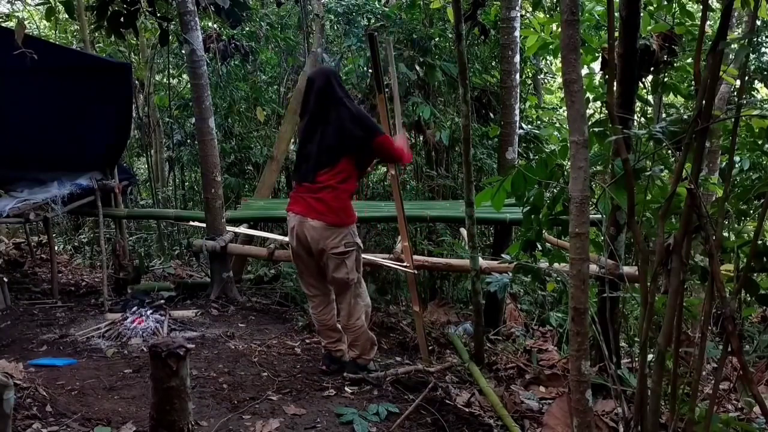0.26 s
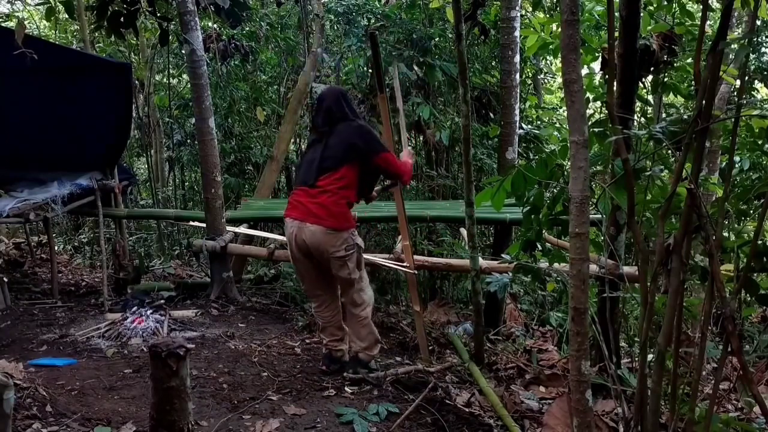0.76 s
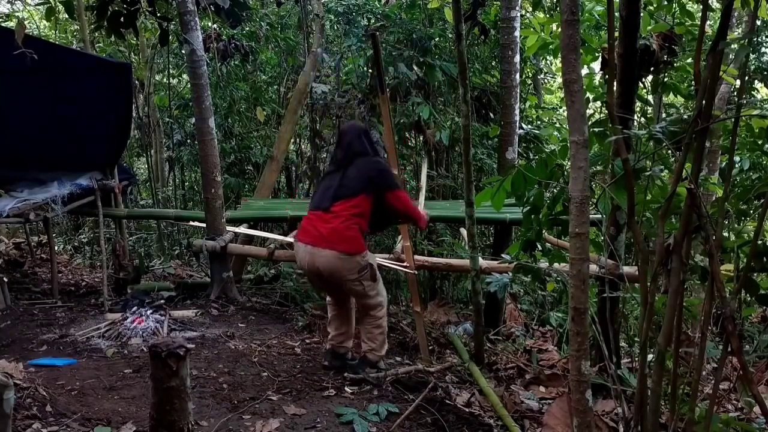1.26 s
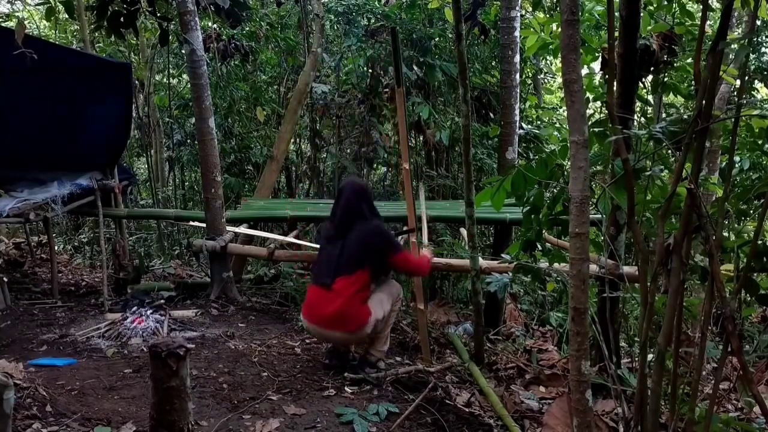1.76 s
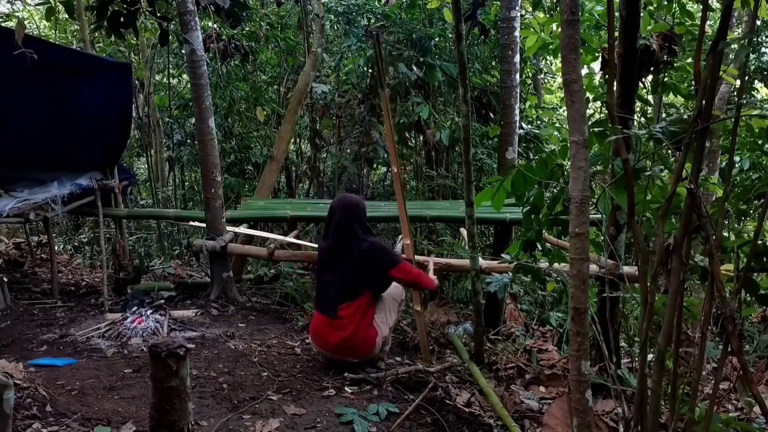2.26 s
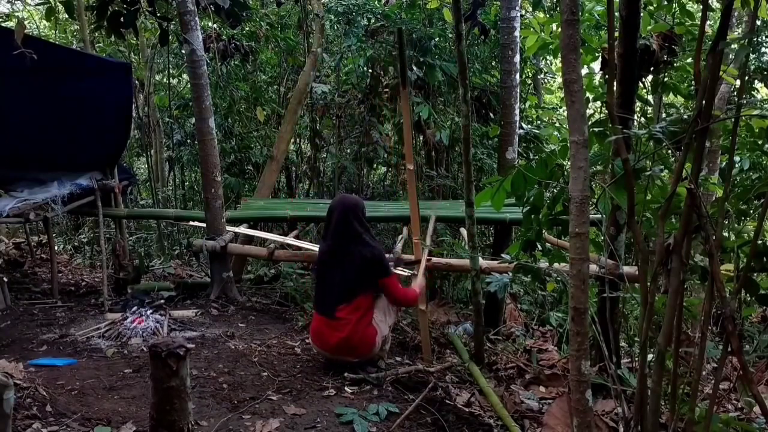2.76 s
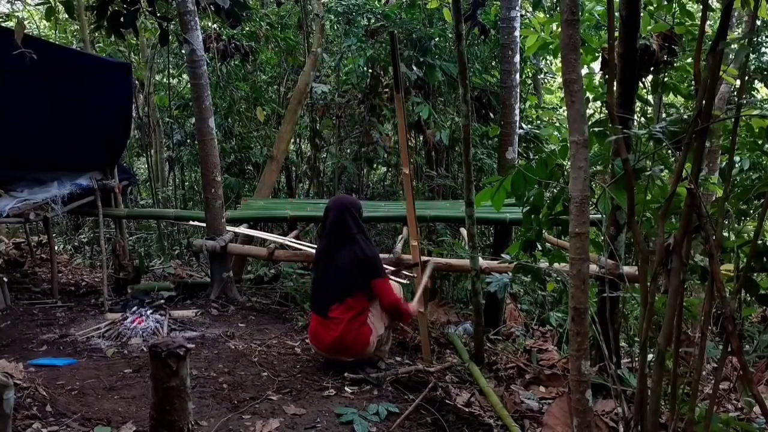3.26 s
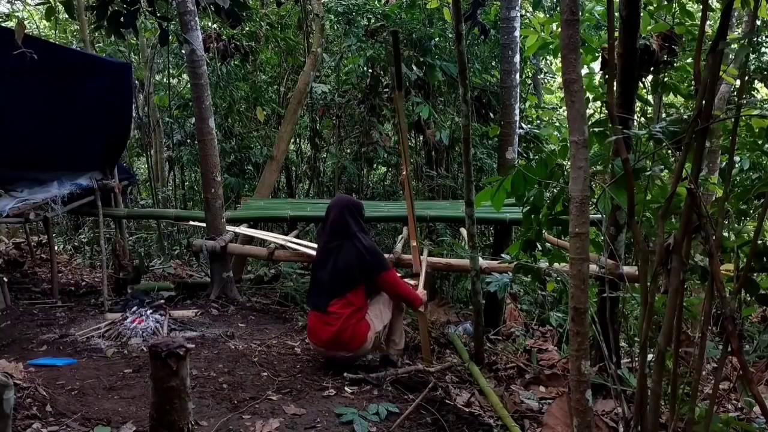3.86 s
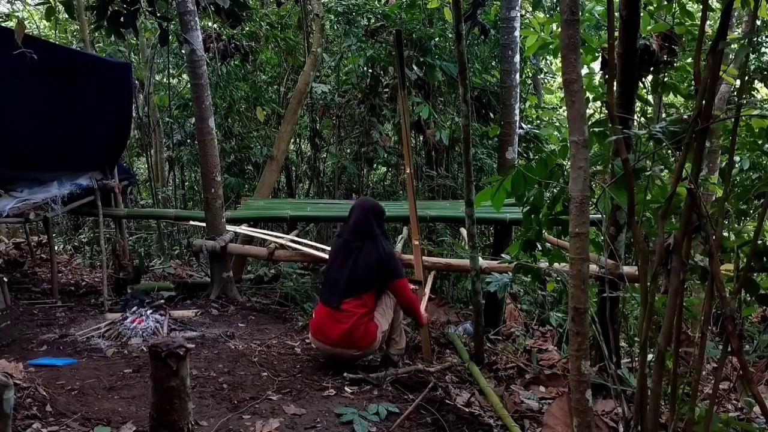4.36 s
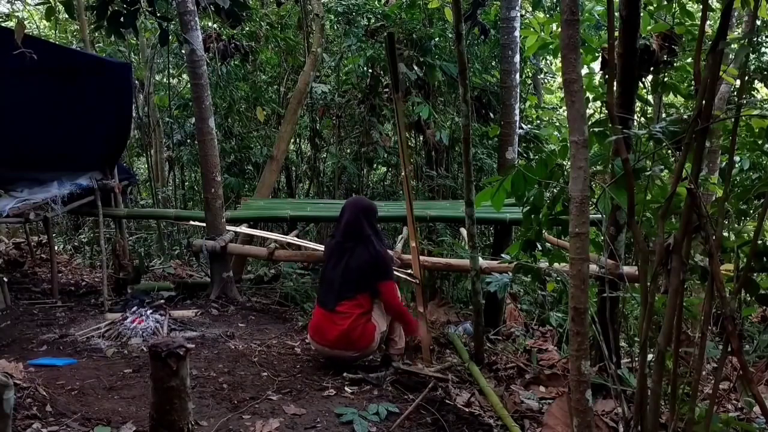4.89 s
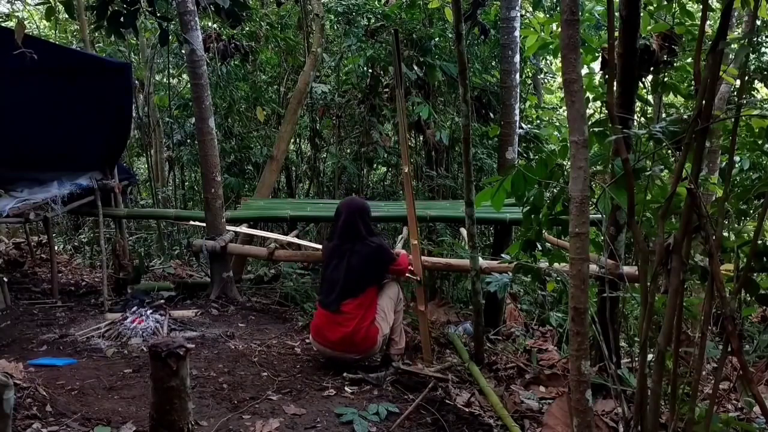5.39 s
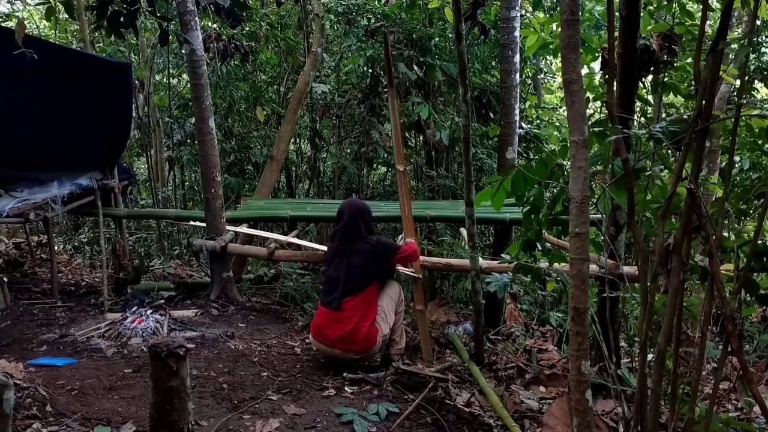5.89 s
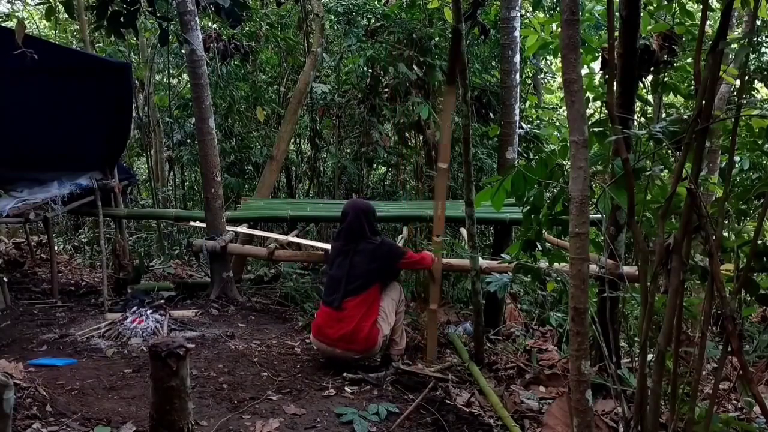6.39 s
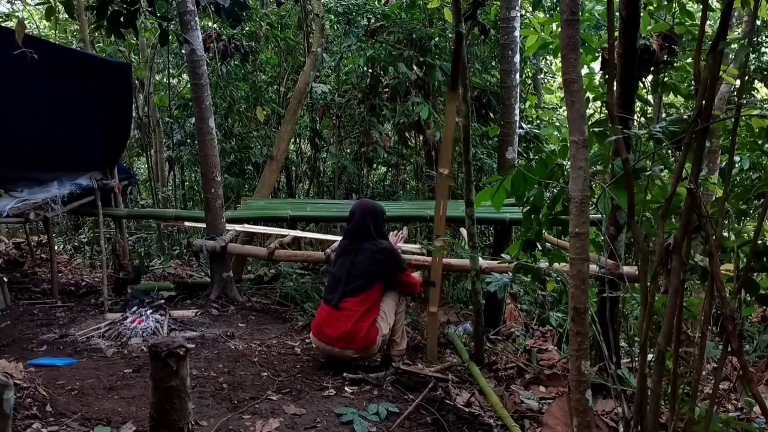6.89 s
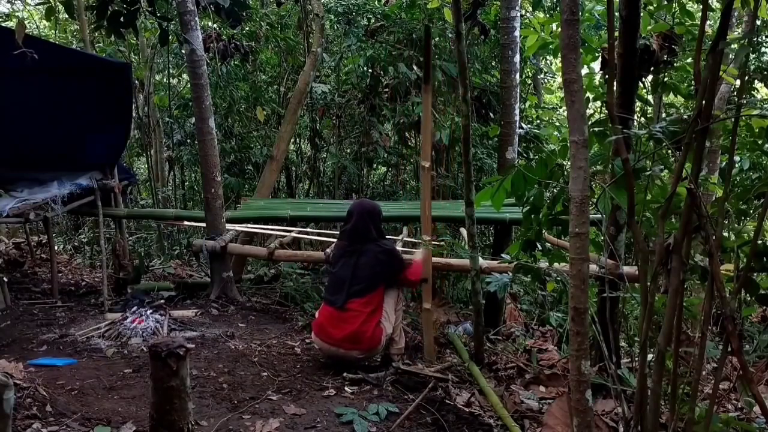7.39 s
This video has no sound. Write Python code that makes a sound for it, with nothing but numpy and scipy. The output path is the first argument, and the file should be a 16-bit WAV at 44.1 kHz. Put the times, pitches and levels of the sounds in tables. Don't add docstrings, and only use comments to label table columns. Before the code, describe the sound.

In a forest, a person handles bamboo poles against a bamboo frame. Hard hollow knocks with rattling splinters and soft ground thuds come irregularly in the first half, the loudest near the middle, then only faint taps near the end. Cicadas sing throughout: rising whistles, short buzzes, a low drone and a shrill chorus that comes and goes. One fixed microphone, mono, with short echoes from trunks.

```python
import sys
import numpy as np
from scipy import signal
from scipy.fft import rfft, irfft
from scipy.io import wavfile
from scipy.ndimage import uniform_filter1d

SR = 44100
rng = np.random.default_rng(int(sys.argv[2]) if len(sys.argv) > 2 else 0)


def volts_from_decibels(level):
    exponent = np.asarray(level, float) / 20
    return 10 ** exponent


def int16_out(signal):
    q = np.round(np.clip(np.atleast_2d(signal).T, -1, 1) * 32767)
    wavfile.write(sys.argv[1], SR, q.astype(np.int16))


N = 336924

# start in seconds, length in seconds,
# goal of the tenth multiple in Hz, level in dB.
WHISTLES = [
    (2.504, 0.78, 3112, -39.5),
    (6.987, .7, 3114, -39),
    (.36, 0.81, 3032, -50.5),
    (4.96, .755, 3030, -50),
    (1.88, .54, 3000, -49.5),
    (5.872, 0.562, 3002, -49),
]


def evened(x):
    return x / np.sqrt(np.mean(x ** 2) + 1e-20)


def read(points, hz):
    f, value = np.transpose(points)
    return np.interp(np.log(hz + 1), np.log(f + 1), value)


def follow(points, t):
    return np.interp(t, *np.transpose(points))


def add(mix, s, sound):
    part = mix[round(s * SR):][:len(sound)]
    part += sound[:len(part)]


def drift(size, hz):
    knots = rng.standard_normal(size // 200 + 2)
    return evened(np.interp(np.arange(size) / SR * hz, np.arange(len(knots)), knots))


def coloured(size, points, treble_db=0):
    hz = np.fft.rfftfreq(size, 1 / SR)
    shape = volts_from_decibels(read(points, hz))
    lift = volts_from_decibels(treble_db / (1 + (5000 / (hz + 1)) ** 6))
    noise = irfft(rfft(rng.standard_normal(size)) * shape * lift, size)
    return noise / np.sqrt(np.mean(shape ** 2))


def resonate(x, hz, width):
    pole = np.exp((2j * np.pi * hz - np.pi * width) / SR)
    return signal.lfilter([1], [1, -2 * pole, pole ** 2], x).real


def swarm(peaks):
    return evened(sum(volts_from_decibels(db) * evened(resonate(rng.standard_normal(N), hz, width))
                      for hz, width, db in peaks))


def air():
    # pitch in Hz, level in dB per Hz.
    hiss_shape = [(25, 4), (40, -6.5), (80, -11), (140, -5), (230, -16.5), (420, -23.5), (1500, -24.5),
                  (1750, -6.5), (2900, -12), (3800, -14.5), (4200, -19), (4750, -18.5), (5300, -15.5),
                  (6900, -21), (8500, -12), (15700, -13)]
    # time in seconds, level change of the hiss around 4.5 kHz in dB.
    hush = [(0, 1), (.2, -8), (.35, -1), (.52, -8.5), (.75, 0), (.97, -10), (1.15, -2), (1.8, 4),
            (2.02, -4), (2.3, 2), (4, -1), (4.3, -7), (4.55, -1), (4.8, -2), (5.1, -5), (5.35, 2)]
    hush_hz, hush_width_hz = 4500, 450
    frames, hz = N // 256 + 5, np.fft.rfftfreq(1024, 1 / SR)
    a, b, patches = rng.standard_normal((frames, 513, 3)).T
    patches = evened(uniform_filter1d(uniform_filter1d(patches, 14, 0), 25, 1))
    patch_db = 2.17 * np.clip(hz / 600, .6, 1)[:, None] * patches
    z = (a + 1j * b) * volts_from_decibels(read(hiss_shape, hz)[:, None] + patch_db)
    hush_db = follow(hush, np.arange(frames) * 256 / SR)
    z = z * volts_from_decibels(np.exp(-((hz[:, None] - hush_hz) / hush_width_hz) ** 2) * hush_db)
    return volts_from_decibels(-49.5) * evened(signal.istft(z, nperseg=1024, noverlap=768)[1][:N])


def drone():
    # time in seconds, level in dB.
    swell = [(0, -58), (.4, -50), (1, -56), (1.2, -51.5), (2.13, -51), (2.83, -61.5), (3.36, -57),
             (3.8, -61), (4.09, -55), (5.77, -52.5), (5.96, -50.5), (6.41, -48.5), (7.0, -56.5),
             (7.64, -58)]
    # pitch in Hz, width in Hz, level in dB.
    hum_peaks = [(1829.5, 30, 9), (1748, 26, -6.5), (1920, 28, -18), (2130, 25, -5)]
    return volts_from_decibels(follow(swell, np.arange(N) / SR) - 3.0) * swarm(hum_peaks)


def shrill_swarm():
    # pitch in Hz, width in Hz, level in dB.
    shrill_peaks = [(7520, 910, -6), (8740, 780, -27), (11240, 590, -3), (13070, 1200, 3), (14980, 930, 1)]
    # time in seconds, level change in dB.
    swell = [(0, -1.5), (2, 2.5), (2.6, -7), (3.8, 1), (4.2, 0), (6.4, 1.5), (6.8, -2), (7.64, -2)]
    return volts_from_decibels(-50.5 + follow(swell, np.arange(N) / SR)) * swarm(shrill_peaks)


def chorus():
    # start in seconds, time it tires in seconds, level in dB.
    songs = [
        (-1, 1.68, -41.5),
        (4, 6.3, -42),
    ]
    singers_hz = [1849, 1854, 1867, 1877, 1889, 1897, 1905, 1917, 1926]
    # multiple of the pulse rate, level in dB.
    carried = [(5, -9), (6, 0.5), (7, 1), (8, 7)]
    # pitch in Hz, level in dB.
    strays = [(11700, -9), (12570, -7), (13400, -7), (13354, -5), (14250, -10), (11050, -3.5), (15178, -1)]
    swell_s, tire_db_per_s, murmur_db = 0.17, 32, -56
    sag_share, sag_s = .016, .35
    t, voices = np.arange(N) / SR, 0
    level, sag = volts_from_decibels(murmur_db), 1
    for start, end, db in songs:
        tired = volts_from_decibels(db - tire_db_per_s * np.maximum(t - end, 0))
        level = level + tired * np.clip((t - start) / swell_s, 0, 1)
        sag = sag - sag_share * np.clip((t - end) / sag_s, 0, 1) * (t < end + 1.5)
    for hz in singers_hz:
        waver = 1 + .0003 * drift(N, 6) + .0007 * drift(N, 200)
        turns = np.cumsum(hz * sag * waver) / SR
        tremble = volts_from_decibels(3.6 * drift(N, 11.0) + 1.9 * drift(N, 180))
        tone = sum(volts_from_decibels(k_db) * np.sin(2 * np.pi * round(k) * turns) for k, k_db in carried)
        voices = voices + tremble * tone
    clock = np.cumsum(sag) / SR
    for hz, db in strays:
        voices = voices + volts_from_decibels(7 + db + 3 * drift(N, 9)) * np.sin(2 * np.pi * hz * clock)
    smear = swarm([(11300, 960, -3.0), (12350, 600, -5.5), (12980, 570, -3.0), (14500, 770, -3.5)])
    return volts_from_decibels(-3.5) * level * evened(evened(voices) + 0.69 * smear)


def knock(db, modes, rattle_db, treble_db, t60):
    # pitch in Hz, rattle level in dB per Hz.
    rattle_shape = [(71, -61), (120, -2.5), (383, -20), (450, -15), (829, -4.5), (899, -10.5), (1100, -5.5),
                    (1620, -3), (3240, -2.5), (5960, -10), (8770, -0.5), (10700, -9), (15500, -3)]
    bumps_per_s, bump_db, bump_t60_s = 400, -13, .02
    t = np.arange(16384) / SR
    ring = sum(volts_from_decibels(level_db - 60 * t / ring_s) * np.sin(2 * np.pi * hz * t)
               for hz, level_db, ring_s in modes)
    ring = ring * (1 - np.exp(-(t / 0.00035) ** 2))
    chatter = coloured(len(t), rattle_shape, treble_db) * volts_from_decibels(2.3 * drift(len(t), 203.0))
    chatter = chatter * (1 + 0.19 * np.exp(-t / 0.003))
    bumps = rng.standard_normal(len(t)) * (rng.random(len(t)) < bumps_per_s / SR)
    damped_ring = (ring * volts_from_decibels(-60 * t / bump_t60_s))[:1024]
    chatter = chatter + volts_from_decibels(bump_db) * evened(signal.oaconvolve(bumps, damped_ring)[:len(t)])
    rattle = volts_from_decibels(rattle_db - 60 * t / t60) * chatter * (1 - np.exp(-t / 0.00097))
    return volts_from_decibels(db) * (ring / abs(ring).max() + rattle)


def poles():
    # start in seconds, peak in dB, rattle in dB, treble of the rattle in dB,
    # time for the rattle to fall 60 dB in seconds.
    blows = [
        (0.583, -13.5, -11, -2, 0.32),
        (1.18, -14.5, -9, 1, 0.28),
        (1.7584, -13.5, -14, -6.5, 0.19),
        (2.3678, -20, -1, -2.5, 0.1),
        (3.8802, -8, -18, -4, 0.3),
        (4.4418, -18.5, -11.5, -5, 0.32),
        (1.42, -23, -9.5, -42, 0.19),
    ]
    # pitch in Hz, level in dB, time to fall 60 dB in seconds.
    tubes = [
        [(748, 4, 0.05), (937, 1.5, 0.033), (1150, 15, 0.01), (1770, 2.5, 0.053), (2340, 8, 0.017),
         (2820, -20, 0.032)],
        [(777, 2, 0.071), (934, -3.5, 0.065), (1205, 8, 0.038), (1570, -4.5, 0.071), (1700, 0, 0.026),
         (2600, -5, 0.068), (2290, 6.5, 0.016), (3125, 6.5, 0.019)],
        [(913, -7, 0.07), (1195, 3.5, 0.05), (1490, -9, 0.053), (1633, 8.5, 0.028), (1724, 1.5, 0.061),
         (2175, -2.5, 0.054), (2710, -5, 0.039)],
        [(900, 0, 0.014), (1145, 5, 0.015), (1680, 1, 0.036), (2880, -5.5, 0.035), (3660, -5, 0.02),
         (4560, -2, 0.016)],
        [(1330, -23, 0.32), (1210, -15, 0.052), (1653, -32, .2), (2210, -27, 0.11), (1690, 2, 0.016),
         (2200, 2, 0.018), (2760, -7.5, 0.029), (3370, 6, 0.0038)],
        [(800, 3.5, 0.0083), (1090, 7, 0.0077), (1400, -12, 0.011), (1650, 2, 0.021), (2280, -1.5, 0.027),
         (3530, -13, 0.048)],
        [(696, -3, 0.026), (1270, 1, 0.047), (1750, 1.5, 0.056), (2180, 6, 0.021), (2330, -1, 0.045),
         (2860, 0, 0.056), (3250, -12, 0.036)],
    ]
    # start in seconds, peak in dB, ring in Hz,
    # treble of the rattle in dB.
    taps = [(.5862, -15.5, 2310, -13), (0.596, -28, 2520, 12), (.5982, -16, 2315, 7),
            (0.6028, -24.5, 2520, -7), (0.611, -27, 1880, 1), (0.616, -28.5, 3420, -4),
            (.645, -30, 1760, -3), (2.4527, -37, 2860, 5), (3.901, -32, 2560, -12), (0.775, -30, 1770, -27),
            (1.237, -31, 1300, -1), (1.304, -38.5, 760, -25), (1.308, -34.5, 1260, -27),
            (2.093, -58, 800, 10), (2.349, -56, 5500, 7), (2.502, -34, 2290, 5.5), (2.672, -66, 900, -27),
            (3.8592, -37, 1340, 5), (3.8585, -35, 3380, -2), (3.927, -50, 1290, -23),
            (3.941, -32, 1320, -26), (3.952, -34, 1310, -26), (4.011, -35, 1315, -32),
            (4.209, -45, 1310, -44), (4.407, -31.5, 2200, 1), (4.454, -35, 2330, 5), (4.548, -59, 3424, -2),
            (4.976, -55, 900, -14), (7.172, -47, 1320, -31), (7.19, -50, 1360, -32),
            (7.213, -40, 1400, -34), (7.2138, -41, 1780, -27), (7.24, -50, 1780, -27),
            (7.252, -51, 1300, -25), (7.237, -39, 1310, -34), (7.269, -58, 1090, -24),
            (7.308, -42, 2200, -5), (7.323, -39.5, 1360, -22), (7.412, -48, 1300, -23),
            (7.471, -53, 3800, -19), (7.596, -49, 1490, -8)]
    # start in seconds, peak in dB, ring in Hz,
    # treble of the rattle in dB, time for the rattle to fall 60 dB in seconds.
    slides = [
        (.004, -43.5, 1700, -14, 0.44),
        (2.385, -40, 2130, -2.5, 0.83),
        (7.163, -63, 1370, -20, 0.74),
        (7.225, -54, 1400, -25, 0.45),
    ]
    out = np.zeros(N)
    for (s, db, *rattle), modes in zip(blows, tubes):
        add(out, s, knock(db, modes, *rattle))
    touches = []
    for s, db, hz, treble_db in taps:
        rattle_db = -2.5 - 0.5343 * (db + 44.0)
        touches.append((s, db, hz, rattle_db, treble_db, 0.17))
    for s, db, hz, treble_db, t60 in slides:
        touches.append((s, db, hz, 3, treble_db, t60))
    for s, db, hz, *rattle in touches:
        modes = [(hz, 0, .027), (1.25 * hz, -9, .025), (1.1 * hz, -8, .02)]
        add(out, s, knock(db, modes, *rattle))
    return signal.sosfilt(signal.butter(2, 420, "high", fs=SR, output="sos"), out)


def thuds():
    # start in seconds, level in dB, centre in Hz, time to fall 60 dB in seconds.
    shifts = [(0.587, -50, 200, 0.13), (1.179, -52, 201, 0.18), (3.882, -53, 262, 0.82),
              (4.443, -49.5, 255, 0.25), (1.3, -52.5, 230, 0.29), (1.419, -54, 516, 0.21),
              (2.1, -62, 450, 0.15), (2.5, -57, 240, 0.5), (2.67, -59, 510, 0.14), (4.0, -60, 430, 0.4),
              (1.76, -51.5, 230, 0.13), (6.32, -64, 475, 0.28), (7.164, -52.5, 900, 0.92),
              (7.2, -55, 296, 0.18), (7.42, -63.5, 317, 0.65)]
    out, t = np.zeros(N), np.arange(16384) / SR
    for s, db, hz, t60 in shifts:
        puff = evened(resonate(rng.standard_normal(len(t)), hz, 1.34 * hz))
        add(out, s, volts_from_decibels(db - 60 * t / t60) * puff * (1 - np.exp(-t / 0.0019)))
    return out


def whistles(calls, paths, orders, rough_db, waver):
    jump, jump_s, creep, creep_s = 0.15, 0.03, 0.06, 0.7
    flutter, flutter_hz, flutter_s = 0.68, 66.5, 0.09
    out = np.zeros(N)
    for (start, length, goal_hz, db), path in zip(calls, paths):
        t = np.arange(0, length, 1 / SR)
        hz = goal_hz * (1 - jump * np.exp(-t / jump_s) - creep * np.exp(-t / creep_s))
        turns = np.cumsum(hz * (1 + waver * drift(len(t), 40.24))) / (10 * SR)
        swell_db = follow(path, t)
        beating = 1 + flutter * np.exp(-(t / flutter_s) ** 4) * np.cos(2 * np.pi * flutter_hz * t)
        tone = 0
        for k, k_db in orders:
            share = 1 if k == 10 else .35
            depth_db = rough_db + 1.6 * min(abs(round(k) - 10), 1)
            level_db = k_db + swell_db * share + depth_db * drift(len(t), 30.8)
            tone = tone + volts_from_decibels(level_db) * np.sin(2 * np.pi * round(k) * turns + k)
        call = np.sqrt(2) * volts_from_decibels(db) * beating * tone * signal.windows.tukey(len(t), .05)
        add(out, max(start, 0), call[round(max(-start, 0) * SR):])
    return out


def far_whistles():
    # start in seconds, length in seconds, goal in Hz, level in dB.
    faint = [
        (-.3, 0.56, 3063, -60),
        (0.683, 0.76, 2860, -66),
        (0.999, 0.99, 2774, -60.5),
        (1.0, 0.88, 2995, -57.5),
        (3.8, 0.61, 3030, -60),
        (4.62, 0.72, 2944, -59),
        (5.22, 0.62, 2958, -53.5),
        (6.42, 0.49, 3016, -59),
    ]
    # seconds into the call, level change in dB.
    middle_paths = [
        [(0, -16), (.055, 2), (.2, -1.5), (.3, -1), (.43, -3.5), (.52, 3.5), (.6, 8), (.715, 0.5), (.76, -10)],
        [(0, -10), (.03, 2), (.07, 4), (.2, -9.5), (.31, 7), (.36, -8), (.5, 1.5), (.68, 4), (.75, -9)],
    ]
    lower_paths = [
        [(0, -9), (.07, 0.5), (.2, -1), (.245, -6.5), (.3, 5), (.41, -7.5), (.48, 9), (.54, -3)],
        [(0, -3), (.04, -5), (.1, 0), (.2, -2), (.225, -4), (.3, 2), (.41, -8), (.48, 7), (.56, 3)],
    ]
    faint_paths = [
        [(0, -21), (.12, -8.5), (.22, 6.5), (.3, -4), (.5, -3), (.62, 8.5), (.77, -6)],
        [(0, -22), (.1, -7.5), (.16, 3.5), (.25, -2), (.35, -3), (.49, -7.5)],
    ]
    soft_path = [(0, 2), (.15, -2), (.5, -1), (.8, -4)]
    # multiple of the pulse rate, level in dB.
    carried = [(9, -14), (10, -0.5), (11, -18), (12, -26), (20, -28)]
    paths = middle_paths + lower_paths + 5 * [soft_path] + faint_paths + [soft_path]
    return whistles(WHISTLES[2:] + faint, paths, carried, rough_db=1.1, waver=0.001)


def ticks():
    # start in seconds, level in dB, time to fall 60 dB in seconds.
    snaps = [(2.349, -36, 0.025), (3.858, -35, 0.026), (4.4061, -30.5, 0.043), (4.4517, -33, .02),
             (7.164, -45.5, .02), (7.212, -49, .02), (7.237, -51, 0.018), (7.308, -40, .04),
             (7.471, -48, .03), (7.597, -46, .02), (2.502, -35, .02), (.5955, -21.5, .03)]
    # pitch in Hz, level in dB per Hz.
    snap_shape = [(600, -30), (1200, -4), (3000, 4), (5000, -13.5), (9000, -6.5), (15000, -1)]
    out, t = np.zeros(N), np.arange(4096) / SR
    for s, db, t60 in snaps:
        add(out, s, volts_from_decibels(db - 60 * t / t60) * coloured(len(t), snap_shape))
    return out


def buzzes():
    # start in seconds, end in seconds, pulse rate in Hz.
    calls = [
        (1.04, 1.78, 281.4),
        (5.65, 6.42, 283.2),
        (2.56, 3.1, 276.4),
        (6.46, 7.1, 277.8),
        (3.185, 3.88, 298.76),
    ]
    # hiss in dB, plain comb of multiples in dB, share of the buzz spent swelling and fading.
    levels = [(-61, -75, .2), (-60, -74, .2), (-63, -75, .2), (-61, -75, .2), (-60, -70, .2)]
    # pitch in Hz, strength of the body in dB.
    body = [(3000, -33), (4300, -5), (5100, 0), (6300, -3), (7200, -3), (8200, 0), (9300, -12),
            (11000, -42)]
    # multiple of half the pulse rate, level in dB.
    standing = [
        [(23, -70), (25, -71), (34, -72), (35, -70), (37, -71), (38, -65), (40, -72), (42, -65), (44, -68),
         (46, -66), (48, -69), (52, -67), (53, -68), (57, -72), (59, -67)],
        [(18, -70), (19, -68), (23, -66), (25, -72), (33, -69), (35, -66), (36, -70), (38, -68), (39, -71),
         (46, -69), (47, -69), (48, -64), (52, -70), (53, -61), (55, -68), (57, -69), (59, -70), (61, -70)],
        [(26, -72), (33, -69), (35, -68), (36, -70), (37, -71), (39, -60), (41, -67), (45, -67), (58, -72),
         (59, -71), (65, -72)],
        [(35, -70), (37, -67), (39, -66), (41, -72), (43, -68), (45, -69), (57, -68), (63, -71)],
    ]
    # multiple of half the pulse rate, level in dB.
    close_standing = [(16, -73), (17, -56), (18, -66), (19, -52), (21, -66), (23, -65), (25, -66),
                      (31, -68), (33, -56), (34, -57), (35, -59), (36, -62), (37, -75), (38, -61),
                      (39, -68), (40, -66), (42, -68), (43, -76), (44, -68), (46, -64), (47, -79),
                      (48, -59), (49, -70), (50, -64), (51, -76), (52, -73), (53, -65), (54, -56),
                      (55, -66), (56, -59), (58, -69)]
    out = np.zeros(N)
    for call, level, strong in zip(calls, levels, standing + [close_standing]):
        start, end, pulse_hz = call
        hiss_db, comb_db, edges = level
        t = np.arange(round((end - start) * SR)) / SR
        clock = np.cumsum(1 + 0.0003 * drift(len(t), 30)) / SR
        comb = {}
        for k in range(24, 70):
            even_db = 1 * (k % 2 == 0)
            uneven_db = 1.5 * rng.standard_normal()
            comb[k] = read(body, k * pulse_hz / 2) + comb_db + even_db + uneven_db
        comb.update(strong)
        tone = 0
        for k, db in comb.items():
            phase = np.pi * pulse_hz * k * clock + 2 * np.pi * rng.random()
            tone = tone + volts_from_decibels(db + 2.7 * drift(len(t), 12.3)) * np.sin(phase)
        gate = 1 + 0.6 * np.cos(2 * np.pi * pulse_hz * clock)
        sound = np.sqrt(2) * tone + volts_from_decibels(hiss_db) * evened(gate * coloured(len(t), body))
        add(out, start, sound * signal.windows.tukey(len(t), edges))
    return out


def high_singer():
    # start in seconds, level in dB.
    calls = [
        (1.859, -57.5),
        (6.41, -57.5),
    ]
    # seconds into the call, pitch of the 22nd multiple in Hz, level in dB.
    tune = [(0, 3640, -9), (.07, 3630, -11.5), (.14, 3603, -0.5), (.27, 3620, -0.5), (0.311, 3664, 1),
            (0.372, 3703, -1.5), (.47, 3755, -0.5), (.6, 3706, -4.5), (.64, 3770, -21)]
    # multiple of the pulse rate, level in dB.
    carried = [(9, -14), (20, -20), (22, 0), (24, -8), (33, -10), (35, -14), (44, -8), (46, -10), (53, -20)]
    out = np.zeros(N)
    s, hz, swell_db = np.transpose(tune)
    t = np.arange(0, s[-1], 1 / SR)
    for start, db in calls:
        pitch = np.interp(t, s, hz) * (1 + .0022 * drift(len(t), 45))
        turns = np.cumsum(pitch) / (22 * SR)
        tone = sum(volts_from_decibels(k_db + 3.5 * drift(len(t), 30)) * np.sin(2 * np.pi * k * turns + k)
                   for k, k_db in carried)
        level = np.sqrt(2) * volts_from_decibels(db + np.interp(t, s, swell_db))
        add(out, start, level * tone * signal.windows.tukey(len(t), .05))
    return out


def near_whistles():
    # seconds into the call, level change in dB.
    near_paths = [
        [(0, -13), (.05, 3), (.075, -6), (.095, 4), (.14, 1), (.19, 8), (.245, -4.5), (.29, -4), (.315, -1),
         (.47, 1.5), (.51, -9), (.555, -2.5), (.62, 0.5), (.68, -5.5), (.7, 0.5), (.77, -12)],
        [(0, -7), (.036, -5), (.046, 3), (.065, -4), (.09, 2.5), (.17, 6), (.2, 1.5), (.255, -3), (.275, -6),
         (.315, -6), (.345, -1), (.41, -0.5), (.43, -3), (.505, 2.5), (.58, -8), (.61, 0), (.66, -4)],
    ]
    # multiple of the pulse rate, level in dB.
    carried = [(8, -24), (9, -19), (10, -0.5), (11, -26), (12, -30), (13, -34.5), (18, -38), (19, -51),
               (20, -27.5), (21, -55)]
    return whistles(WHISTLES[:2], near_paths, carried, rough_db=0.4, waver=0.0007)


def echo(x, db, delay_s):
    return volts_from_decibels(db) * np.roll(x, round(delay_s * SR))


def forest(x):
    # pitch in Hz, time to fall 60 dB in seconds.
    fade_times = [(300, 0.46), (1500, 0.53), (4000, 1), (12000, 1)]
    hz, t, z = signal.stft(rng.standard_normal(SR // 2), SR, nperseg=256)
    tail = signal.istft(z * volts_from_decibels(-60 * t / read(fade_times, hz)[:, None]), SR, nperseg=256)[1]
    tail = np.concatenate([np.zeros(200), tail])
    return signal.fftconvolve(x, tail / np.linalg.norm(tail))[:N]


def scene():
    near = poles() + thuds() + ticks()
    close = near_whistles()
    close = close + echo(close, -20, .041)
    far = far_whistles() + high_singer()
    far = far + echo(far, -14.0, .028) + echo(far, -14.5, .067)
    echoes = forest(volts_from_decibels(-12.5) * near + volts_from_decibels(-11) * close + volts_from_decibels(-5.5) * far)
    insects = buzzes() + drone() + shrill_swarm() + chorus()
    mono = near + close + far + echoes + insects + air()
    return np.array([mono, mono])


def low_pass(x):
    return signal.sosfilt(signal.butter(12, 16750, fs=SR, output="sos"), x)


def record(dry):
    dip_times = [4.45, 4.48, 4.543, 4.55]
    edge = signal.firwin(1601, 15500, window=("kaiser", 9), fs=SR)
    dip_db = -4.5 * np.interp(np.arange(N) / SR, dip_times, [0, 1, 1, 0])
    mix = signal.oaconvolve(dry * volts_from_decibels(dip_db), edge[None], "same")
    return low_pass(mix)


dry = scene()
out = record(dry)
int16_out(out)
```